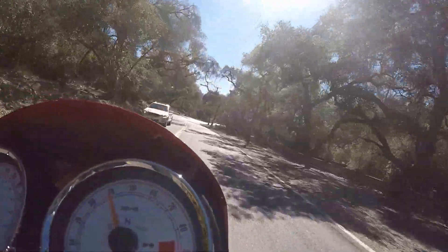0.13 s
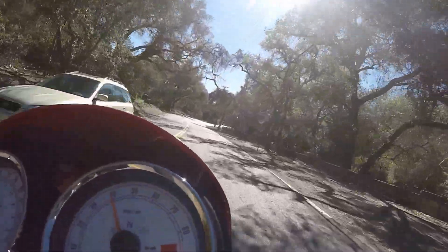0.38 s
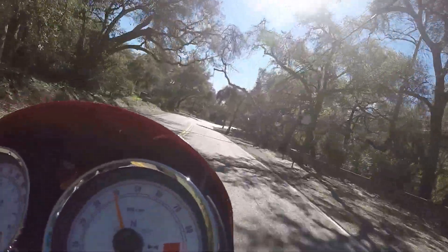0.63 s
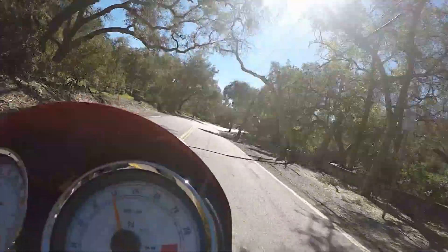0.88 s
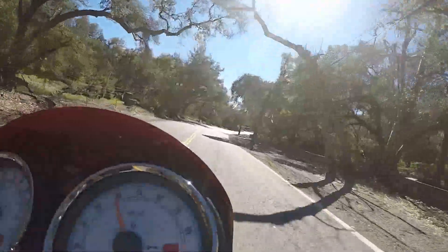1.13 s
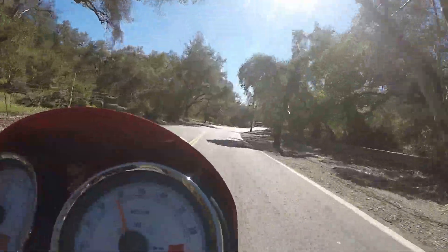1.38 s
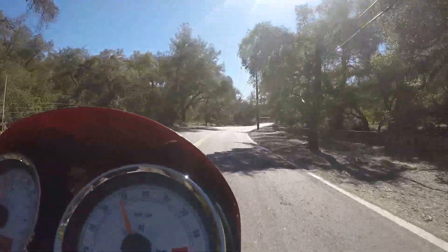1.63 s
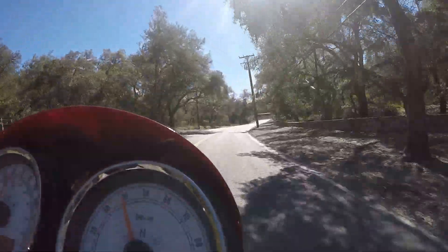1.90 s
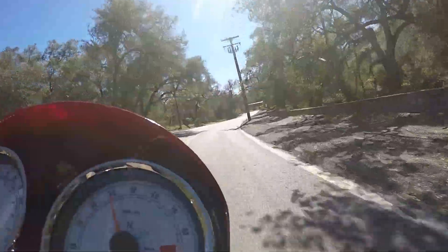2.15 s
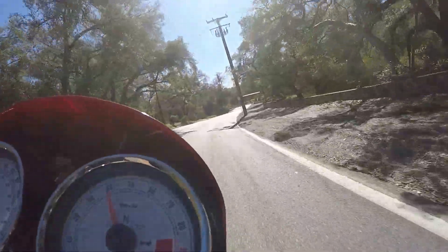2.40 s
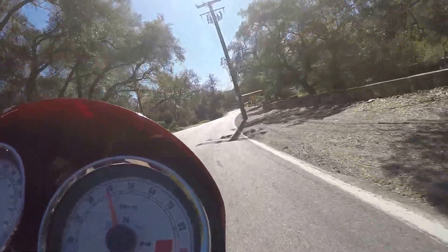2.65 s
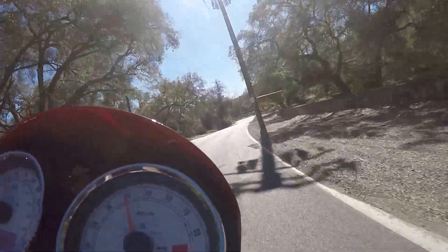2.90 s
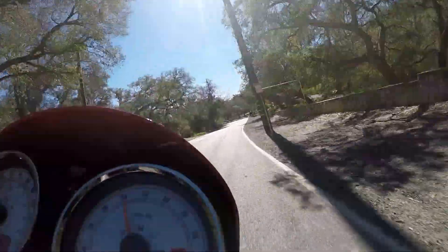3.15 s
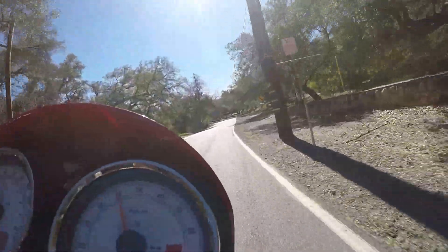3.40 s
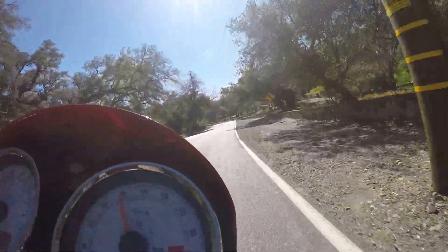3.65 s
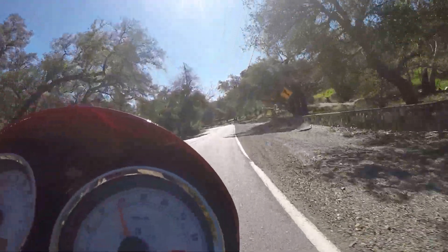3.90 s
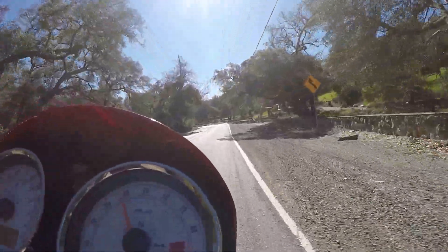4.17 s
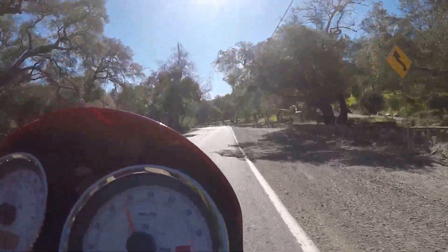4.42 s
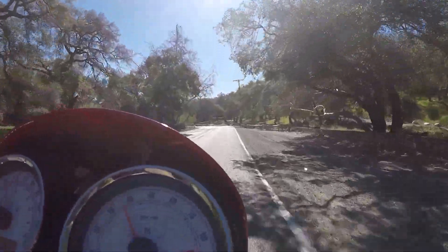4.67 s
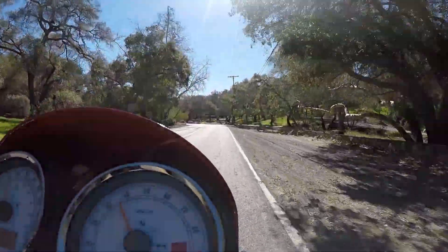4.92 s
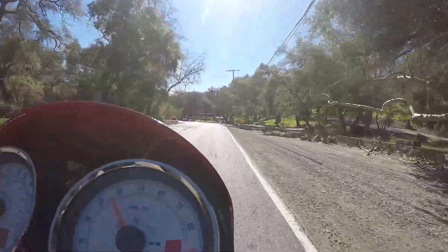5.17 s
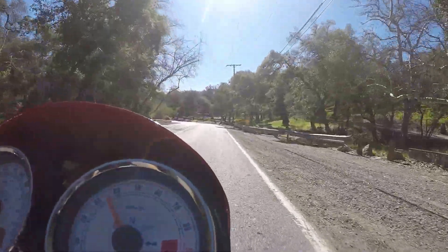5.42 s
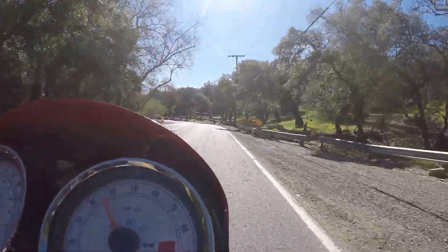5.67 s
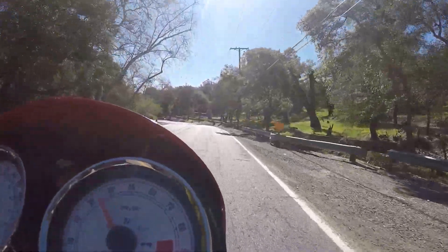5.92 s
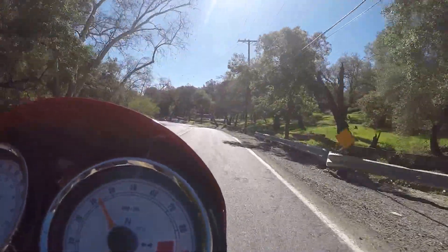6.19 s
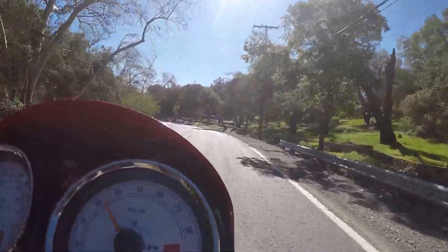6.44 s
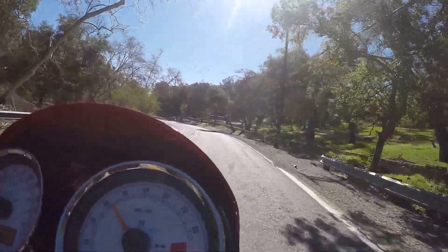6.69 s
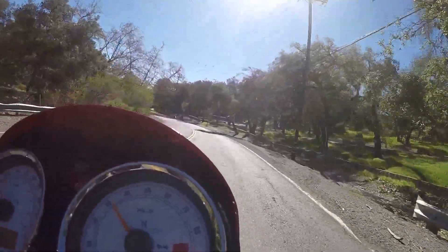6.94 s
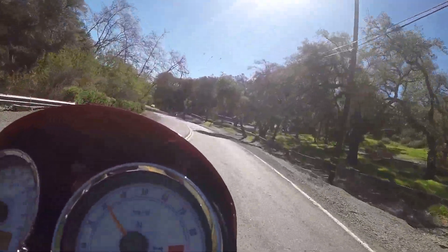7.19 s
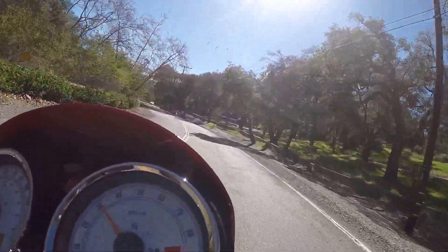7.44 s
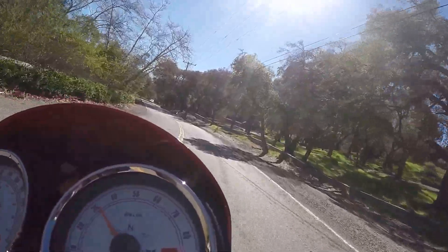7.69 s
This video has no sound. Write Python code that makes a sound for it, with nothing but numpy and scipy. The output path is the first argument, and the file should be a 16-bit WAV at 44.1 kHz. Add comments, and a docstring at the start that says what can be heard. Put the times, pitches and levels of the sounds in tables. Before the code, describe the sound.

An onboard motorcycle ride, captured by a microphone clamped to the frame, dry and close. From 0 s a steady engine drone near 67 Hz carries a dense, grainy housing rattle around 1 to 2 kHz, valve clatter, gear whine and low tyre and wind rumble. At 1.2 s the throttle eases with a dull knock; short panel buzzes catch, and another clunk at 1.85 s takes up the slack. The engine pulls steadily from about 2.6 to 3.5 s, buzzing again. At 3.5 s it eases off with a clunk; soft chain slaps repeat until 5.5 s, with tiny bright clicks mostly before 4.6 s. Pitch sinks to about 54 Hz by 7.3 s, the hollow engine-braking drone strongest from 5.25 s as rumble grows. At 7.5 s a heavy clunk jolts the pitch, load returns, and a fuzzy squeal near 3.3 kHz sings to the end at 7.8 s.

```python
"""On a road, aboard a motorcycle: one microphone in a camera clamped to the frame; the throttle eases and reopens.
Crank orders are sines that swell on frame resonances; gear whine is a set of sines at tooth-mesh multiples.
Road noise, whine, valve clatter and dull clunks pass through the mount and housing resonances.
One panel squeals as a fuzzy tone, chain slaps ring a plate, and very short bright clicks fall here and there.
"""
import sys
import numpy as np
from scipy import signal
from scipy.fft import irfft
from scipy.io import wavfile
from scipy.ndimage import uniform_filter1d

SR = 44100
rng = np.random.default_rng(int(sys.argv[2]) if len(sys.argv) > 2 else 0)


def undo_db(level):
    """Turn decibels back into plain size, where 20 dB means ten times bigger."""
    steps = np.asarray(level, float) / 20
    return 10 ** steps


def pcm_store(signal):
    """Save signal as 16-bit PCM."""
    levels = np.round(np.clip(np.atleast_2d(signal), -1, 1) * 32767)
    wavfile.write(sys.argv[1], SR, levels.astype(np.int16).T)


N = 344862

# load on the gears: (t/s, level/dB from full load)
LOAD = [(0, -0.1), (.6, 0.2), (1.2, -0.1), (1.3, -4), (1.8, -1), (2.1, -2.5), (2.6, -0.5), (3.0, -0.2),
        (3.5, -0.6), (3.6, -3.5), (4.4, -2.5), (5.2, -3.5), (5.6, -3), (6.2, -2), (6.8, -2.5), (7.4, -3.5),
        (7.82, 0)]
# the drive line takes up or lets go its slack:
# (t/s, knock level/dB over the road noise before the housing, speed shudder/turns per s)
JOLTS = [(1.202, -3.5, 1.36), (1.84, 2.5, 1.68), (3.47, -0.5, 1.39), (7.49, 5.5, 1.9)]
CLOSED_S, CLOSED_LENGTH_S = 5.25, 2.18  # the throttle shuts and the engine brakes


def evened(x):
    """Scales to rms 1."""
    return x / np.sqrt(np.mean(x ** 2) + 1e-20)


def columns(rows, t):
    """Every column of a table, interpolated at the times t."""
    s, *values = np.transpose(rows)
    return [np.interp(t, s, v) for v in values]


def wander(hz, count):
    """Random curves of rms near 1, with hz fresh values a second joined by straight lines."""
    step = rng.standard_normal((count, round(N / SR * hz) + 2))
    place = np.arange(N) / SR * hz
    curves = [np.interp(place, np.arange(len(v)), v) for v in step]
    return np.array(curves) * 1.26 ** .5


def ringing(modes, hz):
    """Summed power response of steep resonances (f/Hz, width/Hz, level/dB)."""
    return sum(undo_db(2 * db) / (1 + (2 * (hz - f) / w) ** 2 * 0.79) ** 2 for f, w, db in modes)


def after(t, s, decay):
    """A step at s that dies away exponentially."""
    return (t > s) * np.exp(-np.maximum(t - s, 0) / decay)


def span(t, s, length):
    """One between s and s + length, zero outside, with soft edges."""
    edge_s = .03
    rise = 1 + np.tanh((t - s) / edge_s)
    fall = 1 - np.tanh((t - s - length) / edge_s)
    return rise * fall / 4


def buzz_db(t):
    """How far a loose panel near the sixth order catches and buzzes, in dB."""
    # (start t/s, length/s, level/dB)
    catches = [(0, 0.59, 6.5), (.98, .14, 22), (1.17, 0.13, 22.5), (1.344, .4, 16.5), (1.79, 0.1, 21),
               (2.905, 0.76, 19), (3.778, 0.48, 16), (4.4, 0.57, 13.5)]
    return sum(db * span(t, s, length) for s, length, db in catches)


def rattle(angle, shaking):
    """Road noise throbbing with the crank and the engine's shaking pass the mount and housing resonances."""
    # where each row of the rattle levels acts: f/Hz
    rattle_hz = [70, 220, 600, 1050, 1900, 4200]
    # road rumble, low hum, frame drone, housing buzz, upper buzz and treble:
    # (level/dB, dB per dB of shaking, dB per dB of roughness, dB per dB of panel buzz)
    rattle_db = [(2.8, .1, .99, 0.034), (-0.5, 0.6, .3, .1), (-4.5, 0.47, .01, 0.14),
                 (0.5, 0.57, .01, -0.031), (-0.81, 0.5, .01, 0.08), (-0.64, 0.73, .01, 0.022)]
    # (t/s, level/dB of the engine's shaking of the housing, level/dB of road roughness)
    shake = [(0, 2, 3), (.6, 2.3, 0), (1.2, 2.4, 5.5), (1.6, -0.4, -14), (1.8, 0.5, 8), (2.0, -0.1, 6),
             (2.2, 1.5, -13), (2.5, 2.2, .5), (3.4, 2.1, 0), (3.8, -0.7, -11), (4.2, -5, -12),
             (4.4, -1.2, -5), (5.0, -6.5, -8), (5.2, -4, 8), (5.4, -0.7, 4), (6.2, 0.1, 7.5),
             (6.6, 0.4, 8.5), (7.0, -1.3, 5), (7.4, -1.4, 9), (7.6, 2.2, 3), (7.82, 1.7, -5)]
    # resonances of the camera housing: (f/Hz, width/Hz, level/dB)
    housing = [(392, 140, -1), (715, 163, -6), (997, 151, 1.5), (1177, 150, -6.5), (1432, 130, -13),
               (1630, 366, -3.5), (1816, 190, -4.5), (1953, 106, 1.5), (2108, 130, 1), (2185, 46, 2.5),
               (2338, 130, -7), (2483, 69, -9), (2686, 140, -12), (2915, 110, -15.5), (3351, 92, -8),
               (3510, 150, -16), (3710, 430, -16.5), (4080, 250, -11.5), (4480, 97, -25),
               (4818, 210, -16.5), (5545, 330, -21), (5840, 470, -29.5), (6520, 250, -39.5),
               (7060, 180, -36), (7700, 380, -33), (10080, 830, -41)]
    # resonances of the mount: (f/Hz, width/Hz, level/dB)
    mount = [(62.4, 3.6, 13.5), (114, 16, 1.5), (228, 11, -4)]
    # wind and tyres between the resonances: (f/Hz, level/dB)
    bed = [(250, -5.5), (340, -26.5), (560, -11.5), (850, -10), (1300, -18), (3000, -19.5), (4400, -29.5),
           (5100, -40), (6900, -41), (8500, -42), (9300, -48.5), (11500, -52.5), (14600, -50.5),
           (15300, -65)]
    # the mount passes little here: (f/Hz, width/Hz, level/dB)
    hollows = [(340, 24, -6.5), (614, 15, -3), (836, 28, -7), (1315, 154, -4)]
    closed_drone_db = 1  # added to the frame drone on closed throttle

    throb = 1 + .25 * np.cos(angle) + .15 * np.cos(angle / 2)
    road = rng.standard_normal(N) * throb
    hz, t, z = signal.stft(road, SR, nperseg=2048, noverlap=1536)
    # the road noise is uneven, in patches of time and pitch
    patches = uniform_filter1d(rng.standard_normal(z.shape), size=14, axis=0)
    patches = uniform_filter1d(patches, size=5, axis=1)
    z = z * undo_db(0.27 * evened(patches))
    z = z + signal.stft(shaking, SR, nperseg=2048, noverlap=1536)[2]

    shake_db, road_db = columns(shake, t)
    buzz = buzz_db(t)
    level = np.array([db + a * shake_db + b * road_db + c * buzz for db, a, b, c in rattle_db])
    level[2] += closed_drone_db * span(t, CLOSED_S, CLOSED_LENGTH_S)
    log_hz = np.log(hz + 1)
    level = np.array([np.interp(log_hz, np.log(rattle_hz), v) for v in level.T]).T

    bed_hz, bed_db = np.transpose(bed)
    power = ringing(housing + mount, hz) + undo_db(2 * np.interp(log_hz, np.log(bed_hz), bed_db))
    hollow_db = sum(db * np.exp(-((hz - f) / w) ** 2) for f, w, db in hollows)
    power *= undo_db(2 * hollow_db)
    z = z * np.sqrt(power)[:, None] * undo_db(level)
    return undo_db(-12.0) * signal.istft(z, SR, nperseg=2048, noverlap=1536)[1][:N]


def squeal(t, angle):
    """One panel sings a narrow fuzzy tone, throbbing once every two crank turns, then louder and a little lower."""
    faint_db, db_per_load_db = -47, 1.3
    sing_s, rise_s, sing_db, sag_hz = 7.575, 0.036, 23.5, 13
    level_drift, phase_drift = wander(45.0, count=2)
    sing = (1 + np.tanh((t - sing_s) / rise_s)) / 2
    load_db, = columns(LOAD, t)
    db = faint_db + db_per_load_db * load_db + sing_db * sing + 1.3 * np.cos(angle / 2)
    phase = 2 * np.pi * np.cumsum(3340 - sag_hz * sing) / SR
    return undo_db(db + 1.6 * level_drift) * np.cos(phase + .85 * phase_drift)


def knocks():
    """Chain slaps ring a plate for a moment; very short bright clicks fall at scattered moments."""
    # chain slaps: (t/s, level/dB, f/Hz)
    slaps = [(1.9, -18, 1010), (1.935, -21, 1000), (3.483, -20, 1000), (3.575, -24, 1010),
             (3.653, -21, 1000), (3.814, -20.5, 1005), (3.97, -21, 1005), (4.143, -21, 1000),
             (4.315, -24, 995), (4.484, -22, 980), (4.656, -27, 960), (4.82, -26, 990), (4.9, -24, 990),
             (4.99, -26, 990), (5.15, -24, 980), (5.265, -25, 965), (5.42, -22, 980), (5.525, -23, 1000),
             (7.493, -15, 980), (7.52, -23, 800)]
    # very short bright clicks: (t/s, level/dB before a lift of 2.5 dB)
    clicks = [(0.4894, -50), (1.2692, -45), (1.3422, -33.5), (1.8477, -44), (3.6072, -39.5), (3.6363, -31),
              (3.8224, -41), (3.882, -49), (3.976, -35.5), (4.0528, -37.5), (4.427, -48), (4.46, -48),
              (4.4909, -35.5), (4.5216, -45.5), (4.777, -54.5), (5.7738, -57), (6.7796, -55),
              (6.9445, -51.5), (6.9876, -50.5), (7.567, -54), (7.6177, -51)]
    out, t = np.zeros(N + SR), np.arange(2000) / SR
    slap_swell = np.exp(-((t - .011) / .013) ** 2)
    for s, db, hz in slaps:
        out[round(s * SR):][:2000] += undo_db(db) * slap_swell * np.sin(2 * np.pi * hz * t)
    click = np.exp(-(t / .00011) ** 2) * np.cos(2 * np.pi * 11500 * t)
    for s, db in clicks:
        out[round(s * SR):][:2000] += undo_db(db + 2.5) * click
    return out[:N]


def clunk(t):
    """Drive-line slack knocks as bursts of noise that die away, dulled later by the housing."""
    burst = sum(undo_db(db) * after(t, s, 0.047) for s, db, _ in JOLTS)
    return burst * rng.standard_normal(N)


def clatter(angle):
    """Valve gear repeats one random pattern of knocks every two crank turns."""
    half_order = np.arange(2049)
    strength = undo_db(-5.0 * (half_order % 2)) * (half_order > 16)  # odd half orders are weaker
    strength = strength * (1 + .5 * rng.standard_normal(2049)) / (1 + (half_order / 268.0) ** 4)
    pattern = evened(irfft(strength * np.exp(2j * np.pi * rng.random(2049))))
    slip = 0.019 * wander(12.0, count=1)[0]  # rad: the knocks come a little early or late
    place = (angle + slip) / (4 * np.pi) % 1 * 4096
    return np.interp(place, np.arange(4097), np.append(pattern, pattern[0]))


def whine(t, angle):
    """Tooth meshes and valve train sound as sines that waver in level and phase, the higher ones more in phase."""
    # before the housing colours it: (multiple of crank speed, level/dB at full load, dB per dB of load)
    meshes = [(6.5, -30, -1), (7.5, -31, -1), (10, -28, -1), (10.5, -26, -1.5), (11, -26.5, -1),
              (12, -30, 0), (15, -27, 2.5), (16, -19, 2.2), (19, -23, 2), (23, -18.5, 3), (23.5, -26, 2.5),
              (24, -10.5, 2.6), (24.5, -22, 2.5), (29, -22, 1), (32.17, -18.5, 1), (39, -24, 0),
              (50, -19, 2), (61, -19, 1.5), (72, -14, .5), (74.3, -21, 0), (96, -27, -2)]
    drift = wander(18.0, count=2 * len(meshes))
    quiver = .006 * wander(120.0, count=1)[0]  # rad of crank angle
    load_db, = columns(LOAD, t)
    out = np.zeros(N)
    for (k, db, share), level_drift, angle_drift in zip(meshes, drift[::2], drift[1::2]):
        level = undo_db(db + share * load_db + 1.5 * level_drift)
        out += level * np.cos(k * (angle + .015 * angle_drift + quiver))
    return out


def engine(t):
    """Crank orders are sines that swell as they cross frame resonances. Returns sound and crank angle."""
    # (t/s, crank speed/turns per s)
    crank_speed = [(0, 66.88), (.75, 67.54), (.9, 67.55), (1.125, 67.38), (1.25, 66.14), (1.375, 66.07),
                   (1.625, 65.21), (1.75, 65.51), (1.875, 66.83), (2.0, 65.89), (2.125, 65.84),
                   (2.75, 67.0), (3.25, 66.98), (3.375, 66.8), (3.5, 65.63), (3.625, 65.3), (3.75, 65.36),
                   (4.75, 61.82), (5.125, 60.94), (5.25, 60.49), (5.375, 59.74), (6.0, 57.55),
                   (6.625, 55.13), (7.0, 54.02), (7.25, 53.53), (7.375, 53.58), (7.5, 55.65),
                   (7.625, 54.37), (7.82, 54.57)]
    # shaking of the mount: (t/s, once a turn level/dB, twice a turn level/dB)
    thump = [(0, -13, -34), (.16, -10.5, -27.5), (.5, -11.5, -27.5), (1.12, -11.5, -29),
             (1.3, -10.5, -26.5), (1.6, -12, -27.5), (1.76, -10.5, -25.5), (1.91, -14, -26),
             (2.05, -10.2, -23.5), (2.25, -11, -26), (3.1, -11.6, -29.5), (3.36, -11.5, -27.5),
             (3.52, -10, -30.5), (3.75, -11.5, -27.7), (4.0, -9.5, -26), (4.25, -11.5, -28),
             (4.45, -10.3, -23), (4.64, -12, -23.5), (4.8, -11.5, -21.5), (4.96, -14, -20),
             (5.15, -12.5, -21.5), (5.28, -13.5, -18), (5.45, -14, -16.5), (6.08, -16, -15),
             (6.3, -15, -14.5), (6.6, -18, -13.5), (7.36, -21, -13.5), (7.82, -19, -12)]
    # crank orders that the frame colours: multiples of crank speed
    frame_orders = [3, 4, 6, 7, 8]
    # for each of them: (level/dB on a 0 dB frame resonance, dB per dB of load, dB per dB of panel buzz,
    # waver/dB, dB added on closed throttle)
    frame_order_db = [(-32.5, -.4, .05, 1.2, .1), (-32, -.3, .1, 2.2, -.5), (-52, -.2, 1.01, 2.8, -1.5),
                      (-38, .6, -.1, 1.8, 3), (-41, -.3, .2, 1.2, 9)]
    # frame resonances: (f/Hz, width/Hz, level/dB)
    frame = [(192, 55, -2.1), (214, 14, -0.7), (249.7, 19, -9), (274.5, 30, -11.5), (398, 32, 0.9),
             (432.6, 36, -1.1), (475, 35, -4), (522, 32, -5)]
    # weaker crank orders, the one at firing rate fading most off load: multiples of crank speed
    side_orders = [.5, 1.5, 2.5, 3.5, 4.5, 5]
    # for each of them: level/dB at full load
    side_db = [-46.5, -33, -60.5, -47.5, -59.5, -46]

    steady, = columns(crank_speed, t)
    speed = steady
    for s, _, size in JOLTS:
        speed = speed + size * after(t, s, 0.061) * np.sin(2 * np.pi * 13 * (t - s))
    angle = 2 * np.pi * np.cumsum(speed) / SR
    lag = np.arctan(2 * (speed - 63.5) / 5.5)  # phase turns as the speed crosses 63.5 turns per s
    once_db, twice_db = columns(thump, t)
    out = undo_db(once_db) * np.cos(angle - lag) + undo_db(twice_db) * np.cos(2 * angle)

    closed = span(t, CLOSED_S, CLOSED_LENGTH_S)
    load_db, = columns(LOAD, t)
    buzz = buzz_db(t) * (1 + .07 * wander(35.0, count=1)[0])  # the buzz flutters quickly
    drift = wander(6.0, count=len(frame_orders))
    for k, (db, per_load, per_buzz, waver_db, closed_db), d in zip(frame_orders, frame_order_db, drift):
        order_db = db + per_load * load_db + per_buzz * buzz + waver_db * d + closed_db * closed
        out += undo_db(order_db) * np.sqrt(ringing(frame, k * steady)) * np.cos(k * angle)

    drift = wander(4.0, count=len(side_orders))
    for k, db, d in zip(side_orders, side_db, drift):
        firing = np.exp(-(k - 1.5) ** 2)  # one at the firing rate, order 1.5
        # a bracket rings as an order sweeps through it
        bracket_db = 7.7 * np.exp(-((k * speed - 291) / 14) ** 2)
        level = undo_db(db + 1.8 * d + 3.6 * firing * load_db + bracket_db)
        out += level * np.cos(k * angle + .5 * d[::-1])
    return np.sqrt(2) * out, angle


def scene():
    """Everything reaches one microphone through the frame."""
    t = np.arange(N) / SR
    orders, angle = engine(t)
    shaking = whine(t, angle) + undo_db(-8.5) * clatter(angle) + clunk(t)
    return (orders + rattle(angle, shaking) + squeal(t, angle) + knocks())[None]


def low_pass(x):
    """Removes everything above the highest recorded frequency."""
    return signal.sosfilt(signal.butter(12, 15270, fs=SR, output="sos"), x)


def record(dry):
    """The input stage rounds off its highest peaks under a soft ceiling."""
    ceiling = 1.35  # of full scale
    soft = dry / (1 + (dry / ceiling) ** 4) ** .25
    return low_pass(soft)


dry = scene()
out = record(dry)
pcm_store(out)
```